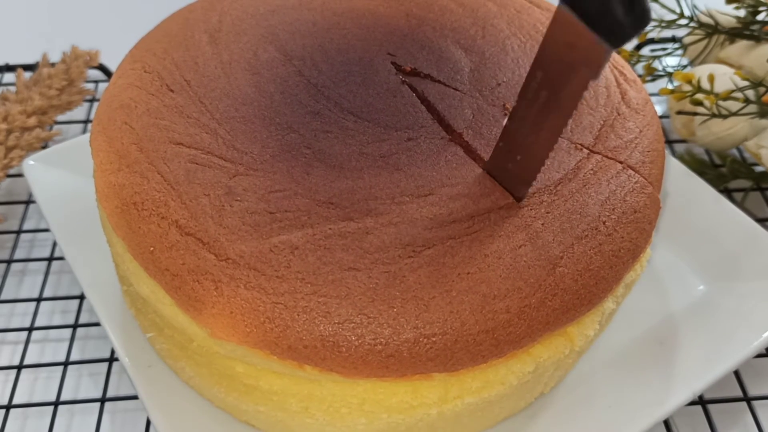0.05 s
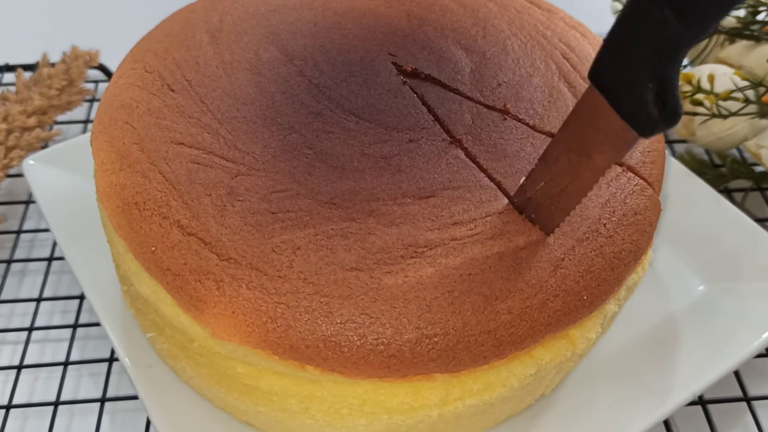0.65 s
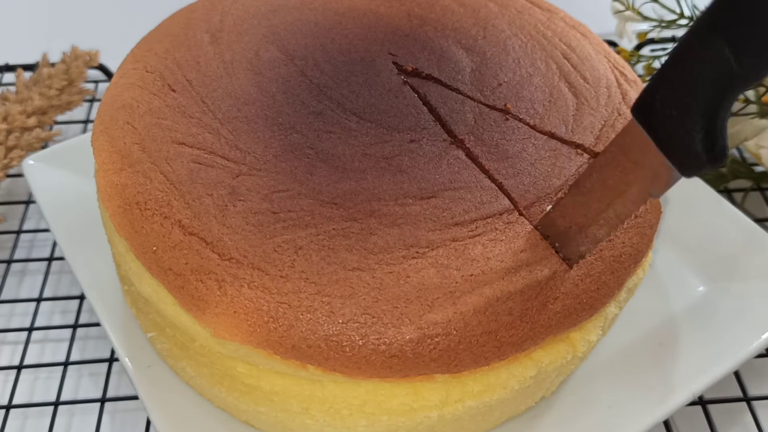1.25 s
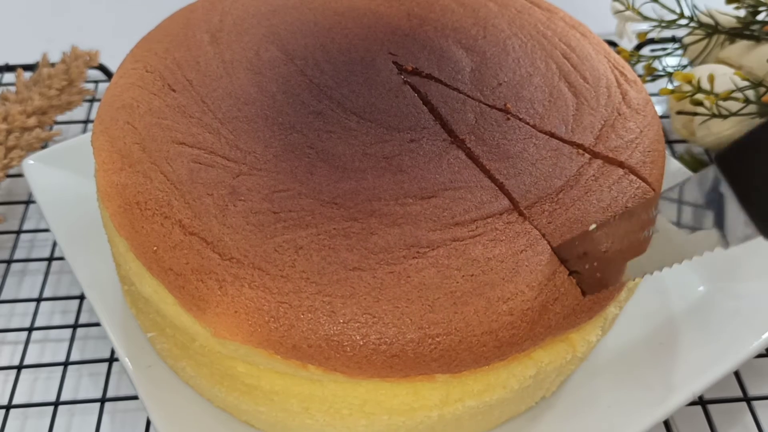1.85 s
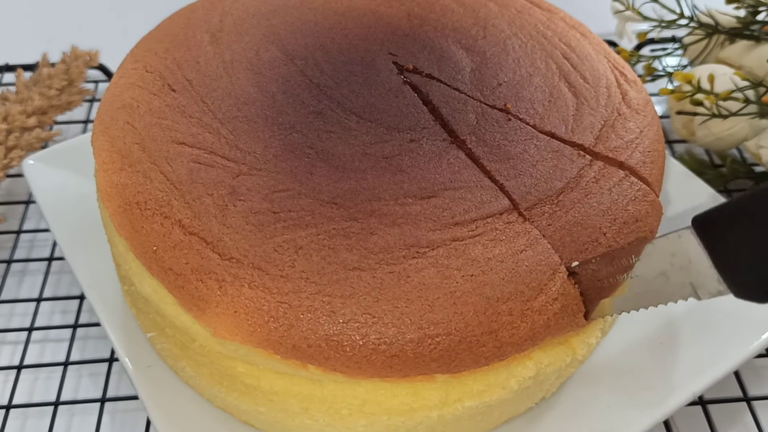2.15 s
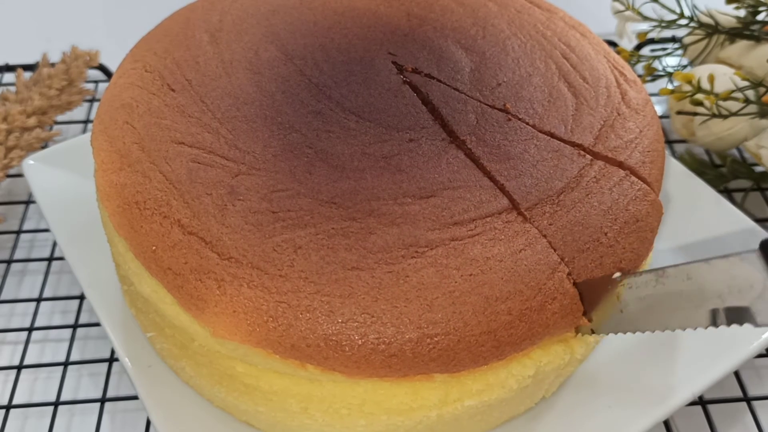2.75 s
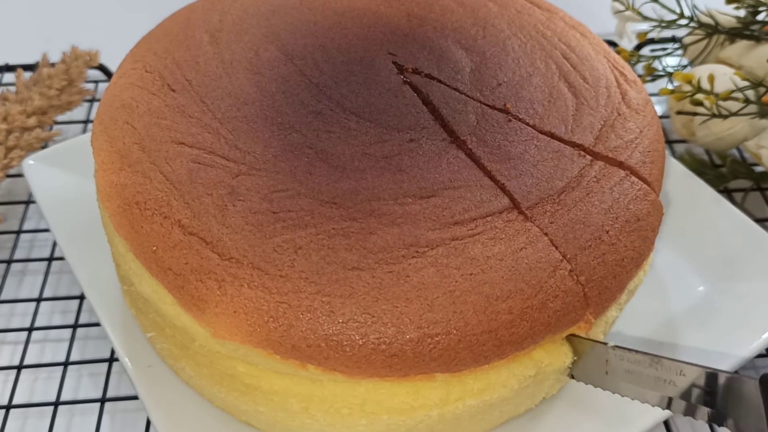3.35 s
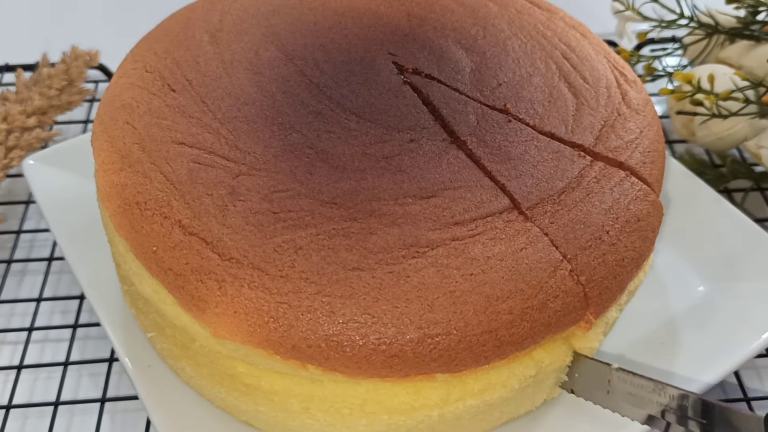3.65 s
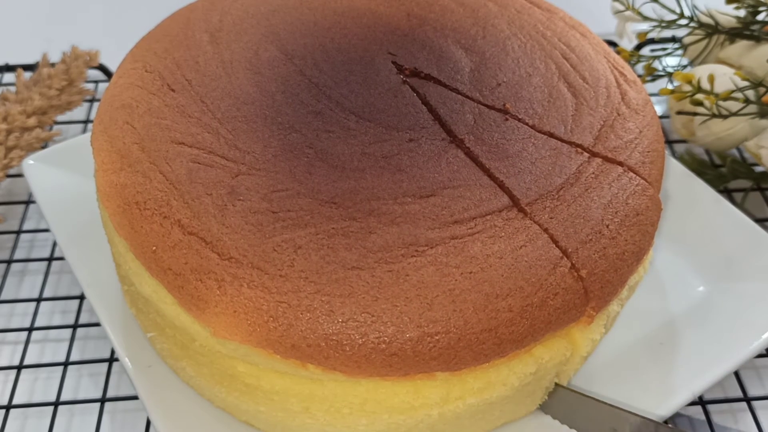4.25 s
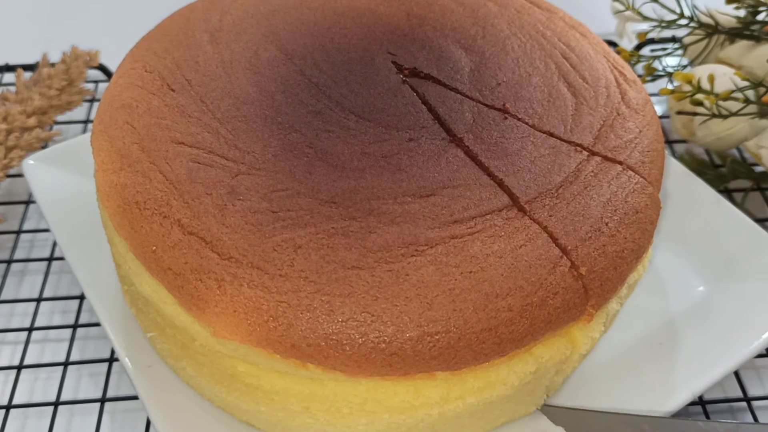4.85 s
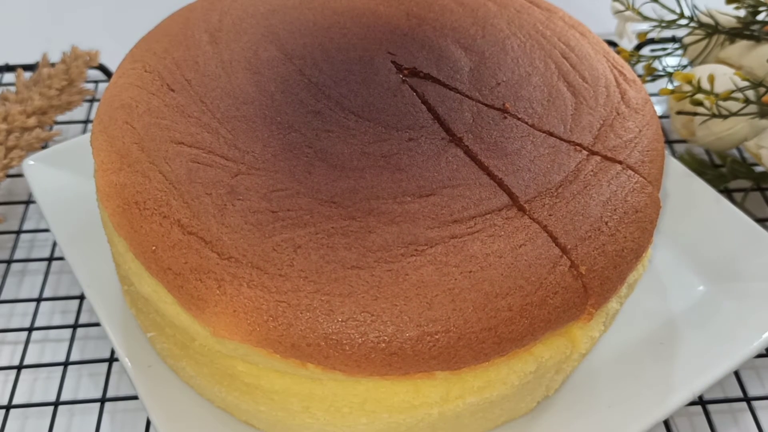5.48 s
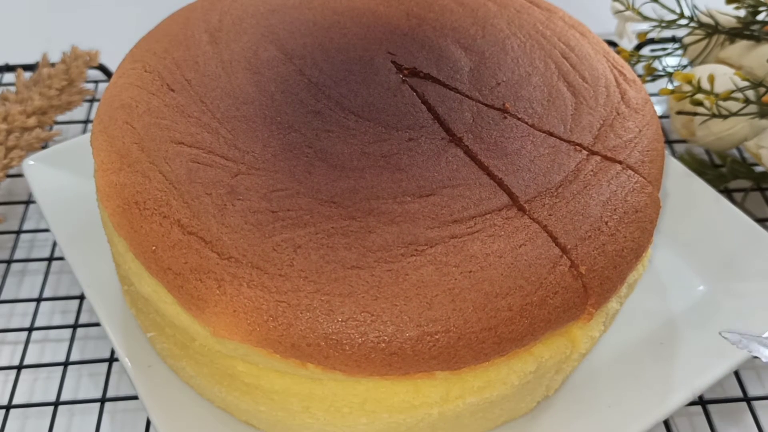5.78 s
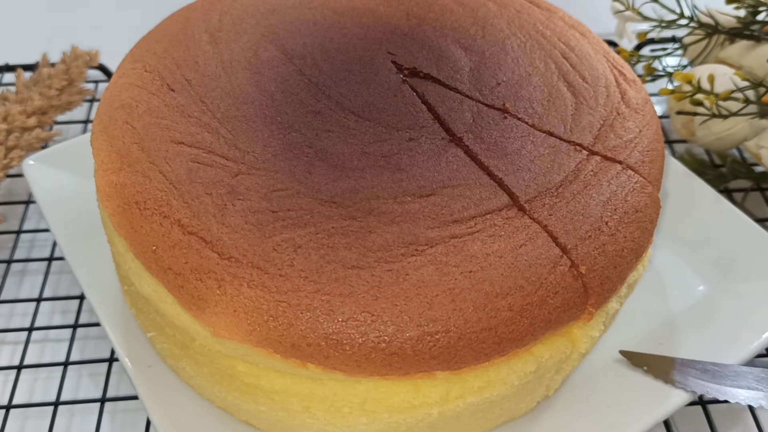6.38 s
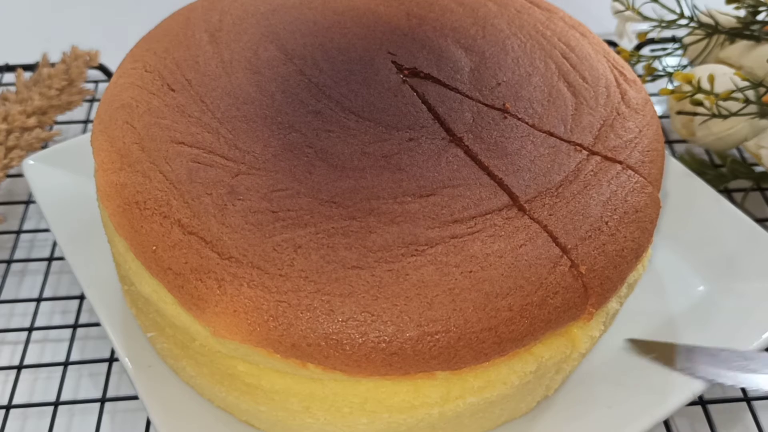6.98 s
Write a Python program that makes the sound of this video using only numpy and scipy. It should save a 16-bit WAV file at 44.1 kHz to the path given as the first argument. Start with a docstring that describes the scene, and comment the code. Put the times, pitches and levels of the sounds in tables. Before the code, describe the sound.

A serrated knife cuts through soft cake and strikes the ceramic plate beneath. Two firm clicks come first, each with a brief ring and a small thud into the table. Lighter, irregular clicks follow among tiny moist crumb ticks. Near the end the bare blade gives a brighter clink and a very faint scrape. The clicks sound close, with a short kitchen echo over a quiet appliance hum and airy hiss.

```python
"""A serrated knife clicks on a ceramic plate as it saws through soft cake, moving from middle to rim.
Each click rings the plate and the steel blade and thuds into the table below.
The cake damps the plate, so each click is short and the kitchen rings on after it.
Moist crumbs tick, the blade drags faintly over the glaze, and an appliance hums in the room."""
import sys
import numpy as np
from scipy import signal
from scipy.fft import rfft, irfft, next_fast_len
from scipy.io import wavfile
from scipy.ndimage import map_coordinates

SR = 44100
rng = np.random.default_rng(int(sys.argv[2]) if len(sys.argv) > 2 else 0)


def wav_record(signal):
    """Record a signal, one row per channel, as 16-bit PCM in the file named by sys.argv[1]."""
    frames = np.transpose(np.atleast_2d(signal))
    bounded = np.clip(frames, -1, 1)
    # unit amplitude maps onto the largest positive 16-bit level
    quanta = np.round(bounded * 32767).astype(np.int16)
    wavfile.write(sys.argv[1], SR, quanta)


N = 313988
LEAD = SR // 4  # samples of run-up before time zero


def amp(db):
    """Turn decibels into a number to multiply by."""
    return 10 ** (np.asarray(db) / 20)


def unit(x):
    """Scale a sound to an average strength (rms) of 1."""
    return x / np.sqrt(np.mean(x ** 2) + 1e-20)


def along(points, hz):
    """Read between (frequency, value) points, with octaves evenly spaced."""
    freqs, values = np.transpose(points)
    return np.interp(np.log(hz + 1), np.log(freqs + 1), values)


def filtered(x, response):
    """Turn each frequency up or down by the gain response(hz)."""
    n = x.shape[-1]
    padded = next_fast_len(n + 4096)
    return irfft(rfft(x, padded) * response(np.fft.rfftfreq(padded, 1 / SR)), padded)[..., :n]


def noise(spectrum, shape):
    """Noise of strength 1, its tone shaped by (frequency, level) points."""
    return unit(filtered(rng.standard_normal(shape), lambda hz: amp(along(spectrum, hz))))


def wobble(rate):
    """A smooth curve along random points, rate of them a second."""
    points = rng.standard_normal(int(N * rate / SR) + 4)
    return map_coordinates(points, [np.arange(N) * rate / SR], order=2)


def fade(t, t60):
    """Die away by 60 dB in t60 seconds, the ring time."""
    return np.exp(-np.log(1000) * t / t60)


def add(track, at, sound):
    """Mix a sound into a track, starting at a time in seconds."""
    start = max(LEAD + round(at * SR), 0)
    part = track[:, start:start + sound.shape[-1]]
    part += sound[..., :part.shape[-1]]


# Tone of the air's rush, shared by left and right: f/Hz, relative level/dB
AIR_SHARED = [(15, -70), (25, -40), (44, -19), (69, -42), (91, -1.5), (162, -4.5), (192, -0.5), (217, -6.5),
              (249, 1), (319, -7.5), (415, -2), (531, -14.5), (844, -8.5), (1000, -17), (1300, -34),
              (2200, -120)]
# Tone of the rush that is opposite in left and right, so it sounds wide: f/Hz, relative level/dB
AIR_WIDE = [(15, -75), (25, -25), (91, -6), (195, -4.5), (220, -15), (314, -1), (350, -3), (469, -8.5),
            (539, -6), (620, -11), (769, 0), (1000, -12), (1300, -6.5), (2200, -120)]
# Tone of the fine hiss: f/Hz, relative level/dB
HISS_TONE = [(600, -54), (1000, 0.5), (1400, -1), (2200, -1.5), (2700, -7), (4500, -9), (5300, -17.5),
             (6600, -9.5), (8200, -14), (12000, -13.5), (15000, -10.5)]


def room_air(shared_db=-53.5, wide_db=-57, hiss_db=-57):
    """The air in the room makes a low rush with a fine hiss on top."""
    shared = amp(shared_db) * noise(AIR_SHARED, N)
    wide = amp(wide_db) * noise(AIR_WIDE, N) * np.array([[1], [-1]])
    hiss = amp(hiss_db) * noise(HISS_TONE, (2, N))
    return shared + wide + hiss


# The notes in the appliance's hum: f/Hz, level/dB
HUM_NOTES = [(63, -72.5), (100.3, -67), (245, -74.5), (408, -83), (664, -74.5), (867, -73.5)]


def appliance_hum(waver_db=2, drift_radians=0.29):
    """An appliance hums a few low notes that waver in loudness and pitch."""
    t, hum = np.arange(N) / SR, np.zeros(N)
    for hz, db in HUM_NOTES:
        gain = np.sqrt(2) * amp(db + waver_db * wobble(3.7))
        hum += gain * np.sin(2 * np.pi * hz * t + drift_radians * wobble(5.3))
    return hum


# How long the kitchen rings on: f/Hz, ring time/s
ROOM_RING = [(150, 0.44), (1400, 0.98), (3000, 0.81), (6600, 0.58), (9000, 0.37), (15000, 0.5)]
# The first echoes off the walls: delay/s, level/dB
WALL_ECHOES = [(.0235, -14.3), (.028, -21), (.032, -14), (.0415, -22), (.055, -22)]


def kitchen_echo(x, tail_db=-13.5, build_up_s=0.02, early_db=-16, wall_hz=2100):
    """The walls send back a few dull echoes, and many more blur into a fading tail."""
    out, block = np.zeros_like(x), SR // 2
    for start in range(0, x.shape[1], block):  # a fresh random tail every half second
        hz, t, bands = signal.stft(rng.standard_normal((2, SR)), SR, nperseg=256)
        build_up = np.where(t < build_up_s, amp(early_db), 1)
        decay = fade(t, along(ROOM_RING, hz)[:, None])
        tail = signal.istft(bands * build_up * decay, SR, nperseg=256)[1]
        tail *= amp(tail_db) * np.sqrt(2) / np.linalg.norm(tail)
        echo = signal.fftconvolve(x[:, start:start + block], tail, axes=1)[:, :x.shape[1] - start]
        out[:, start:start + echo.shape[1]] += echo
    dulled = filtered(x, lambda hz: 1 / np.sqrt(1 + (hz / wall_hz) ** 4))
    for delay, db in WALL_ECHOES:
        lag = round(delay * SR)
        out[:, lag:] += amp(db) * dulled[:, :-lag]
    return out


# Rubs on the glaze: middle t/s, length/s, f/Hz, pitch slide/(Hz per s), width/Hz, level/dB
BLADE_RUBS = [(3.749, .28, 4280, -4000, 520, -65.5), (3.772, .42, 4580, 0, 240, -70),
              (6.918, 0.46, 3030, 0, 110, -64.5), (6.97, 0.5, 3840, -2, 240, -61.5)]


def blade_rubs():
    """The flat of the blade sings faintly on the glaze: a narrow band of noise that may slide in pitch."""
    out = np.zeros((2, LEAD + N))
    for middle, length, centre_hz, slide, width_hz, db in BLADE_RUBS:
        n = int(length * SR)
        hiss = rng.standard_normal((2, SR))
        band = unit(filtered(hiss, lambda hz: 1 / (1 + (2 * (hz - centre_hz) / width_hz) ** 2)))
        from_middle = np.arange(n) / SR - length / 2
        pitch_shift = np.exp(1j * np.pi * slide * from_middle ** 2)
        rub = np.real(signal.hilbert(band)[:, :n] * pitch_shift)
        add(out, middle - length / 2, amp(db) * rub * signal.windows.tukey(n, 0.75))
    return out


# Teeth graze the plate: middle t/s, length/s, level/dB, bare (0 blade in the cake, 1 out of it)
TOOTH_GRAZES = [(4.888, 0.23, -68, 0), (6.613, 0.057, -67.5, 1), (6.997, 0.089, -68, 1),
                (7.043, 0.037, -60.5, 1)]


def tooth_grazes(slips_per_s=700):
    """The teeth slip in many tiny jerks, and each one rings the plate and the blade."""
    out, t = np.zeros((2, LEAD + N)), np.arange(SR // 20) / SR
    for middle, length, db, bare in TOOTH_GRAZES:
        n = int(length * SR)
        strengths = rng.standard_normal(SR)[:n] * np.hanning(n)
        slips = strengths * (rng.random(SR)[:n] < slips_per_s / SR)
        ring = plate_ring(t, place=0.37, tilt=10) + blade_ring(t, bare, tilt=0.5)
        scrape = signal.fftconvolve(slips[None], ring, axes=1)
        add(out, middle - length / 2, amp(db) * unit(scrape))
    return out


# The clearest snaps of crumb leaving the blade: t/s, level/dB
CRUMB_SNAPS = [(0.4562, -40), (1.9384, -38.5), (1.9903, -42), (2.271, -44), (3.582, -40), (4.2177, -42.5),
               (4.2905, -46), (5.2843, -44)]


def crumb_ticks(t60=0.011, low_hz=6000, faint_count=2, faint_db=-7.5, scatter_s=0.043):
    """Moist cake tears in tiny bright snaps, each clear one among a few fainter ones."""
    out, t = np.zeros((2, LEAD + N)), np.arange(SR // 50) / SR
    faint = [(at + scatter_s * rng.standard_normal(), db + faint_db)
             for at, db in CRUMB_SNAPS for _ in range(faint_count)]
    for at, db in CRUMB_SNAPS + faint:
        hiss = rng.standard_normal((2, len(t)))
        snap = unit(filtered(hiss, lambda hz: hz ** 6 / (hz ** 6 + low_hz ** 6)))
        add(out, at, amp(db) * snap * fade(t, t60))
    return out


# The low notes of the table under the plate: f/Hz, ring time/s, relative level/dB
TABLE_NOTES = [(162, 0.082, -11), (245, 0.029, -2.5), (292, 0.069, -12.5), (460, 0.018, 0.5),
               (640, 0.018, 2)]


def table_thud(t, place, middle_db=-21, rim_change_db=-6.5, band_hz=(105, 850)):
    """The plate's foot passes a blow to the table; less gets through from the overhanging rim."""
    thud = sum(amp(db) * np.sin(2 * np.pi * hz * t) * fade(t, t60) for hz, t60, db in TABLE_NOTES)
    # the table top gives off neither deep bass nor treble
    thud = signal.sosfilt(signal.butter(4, band_hz, "band", fs=SR, output="sos"), thud)
    return amp(middle_db + rim_change_db * place ** 2) * thud


# Tone of steel hitting glaze: f/Hz, relative level/dB
CRACK_TONE = [(150, -40), (400, -26), (720, 2), (980, -6.5), (1700, -6.5), (2500, 2.5), (4400, -1.5),
              (5700, -13.5), (6500, -4.5), (8200, 0.5), (12000, -8.5), (15500, -12)]


def glaze_crack(t, place, bare, tilt, t60=0.025, rise_s=0.0013):
    """Steel hits glaze with a burst of noise, louder toward the rim and with a bare blade."""
    tone = [(hz, db + brighten(hz, tilt)) for hz, db in CRACK_TONE]
    burst = noise(tone, (2, len(t))) * fade(t, t60) * (1 - np.exp(-t / rise_s))
    crack_db = -13.5 + 6.5 * place + 16 * bare
    return amp(crack_db) * burst


def brighten(hz, tilt):
    """Decibels to add at each frequency: tilt dB for every octave above 2500 Hz."""
    return tilt * np.log2(hz / 2500)


def ringing(t, hz, t60, level_db, pan_db, scatter_db=0.5, rise_s=0.001, spread_hz=2800, detune=0.0015):
    """Fading notes in stereo; the knife's load shifts their pitch and strength a little at every blow."""
    level_luck, pan_luck, skew_luck, pitch_luck = rng.standard_normal((4, len(hz)))
    sides = np.array([[1], [-1]])
    gain = amp(level_db + sides * pan_db / 2 + scatter_db * (level_luck + sides * pan_luck))
    gain *= (-1) ** np.arange(len(hz))  # neighbouring notes swing opposite ways
    hz = hz * (1 + detune * pitch_luck)
    # high notes reach the two microphones out of step
    skew = sides * np.minimum(hz / spread_hz, np.pi / 4) * np.sign(skew_luck)
    waves = np.sin(2 * np.pi * hz[:, None] * t + skew[..., None]) * fade(t, t60[:, None])
    return np.sum(gain[..., None] * waves, axis=1) * (1 - np.exp(-t / rise_s))


# The notes of the bare steel blade, held in the hand: f/Hz, ring time/s, relative level/dB
BLADE_NOTES = [(1985, 0.13, -17), (2680, 0.037, -8.5), (2967, 0.03, -4), (2960, 0.36, -24),
               (3260, 0.03, -9), (3666, 0.24, -24), (3970, 0.026, -19), (4270, 0.021, -9),
               (4930, 0.26, -24), (6520, 0.25, -25), (7300, 0.024, -21), (7605, 0.053, -9),
               (8270, 0.04, -13), (12000, 0.036, -12), (12600, 0.077, -20), (13250, 0.04, -21),
               (14300, 0.04, -16), (14720, 0.09, -15), (15350, 0.06, -20)]


def blade_ring(t, bare, tilt, buried_db=-12.5, bare_gain_db=19, buried_ring_share=0.27):
    """Cake chokes the steel; the barer the blade, the louder and longer it rings."""
    hz, t60, db = np.transpose(BLADE_NOTES)
    t60 = t60 * buried_ring_share ** (1 - bare)
    level_db = db + buried_db + bare_gain_db * bare + brighten(hz, tilt)
    return ringing(t, hz, t60, level_db, pan_db=0)


# The plate's notes: f/Hz, ring time/s, left over right/dB, then relative level/dB when it is hit
# in the middle, a third of the way out, two thirds out and on the rim
PLATE_NOTES = [(1175, 0.032, 1.5, -7.5, -18.5, -19.5, -33), (1353, 0.029, -3, -5.5, -1, -20, -16),
               (1484, 0.022, -5, -3, -19, -15, -23), (1640, 0.021, -1, -14.5, -2.5, -24, -26),
               (1995, 0.028, 0, -18, -11, -14.5, -4), (2590, 0.0069, -2, 0, -14, -3, -27),
               (2920, 0.017, 0.5, -12, -4, -6, -16), (3155, 0.019, 2.5, -11.5, -10.5, -7, -10),
               (3478, 0.042, 2, -27, -13, -24, -3), (3720, 0.027, -6, -29, -30, -10, -15),
               (4160, 0.013, -3, -14, -33, -18, -21), (4645, 0.023, -9, -20, -20, -26, -13),
               (5020, 0.026, 2.5, -22.5, -18, -6.5, -8), (5370, 0.015, 9, -33, -17, -28, -16),
               (6574, 0.025, 1.5, -12, -4.5, -5, 2.5), (6730, 0.02, 8, -19, -22, -19, -14),
               (7670, 0.023, 3, -17.5, -16.5, -35, -10), (8220, 0.052, 6, -34, -17.5, -24, -16),
               (12000, 0.03, -8, -31, -28, -44, -38), (12755, 0.016, -2, -30, -28, -42, -31),
               (13500, 0.012, -13, -23, -29, -29, -7), (14456, 0.022, -3, -32, -22, -32, -20)]


def plate_ring(t, place, tilt, low_hz=1050):
    """The plate rings with many short notes; where the knife lands sets how strong each one is."""
    hz, t60, pan_db, *spots_db = np.transpose(PLATE_NOTES)
    spots = np.linspace(0, 1, len(spots_db))
    level_db = np.array([np.interp(place, spots, note_db) for note_db in np.transpose(spots_db)])
    ring = ringing(t, hz, t60, level_db + brighten(hz, tilt), pan_db)
    # the plate is too small to give off sound below its lowest note
    return signal.sosfilt(signal.butter(5, low_hz, "high", fs=SR, output="sos"), ring)


# The knife hits the plate: t/s, relative level/dB, place (0 middle, 1 rim),
# bare (0 blade in the cake, 1 out of it), left over right/dB
KNIFE_HITS = [(-0.085, -10.5, 0.072, 0, 1.5), (0.5484, -7, 0.067, 0.052, 1.5),
              (1.243, -12, 0.16, 0.091, 1.5), (2.083, -32.5, 0.18, 0.17, 3), (2.9423, -28, 0.42, 0, 3),
              (3.0243, -36.5, 0.38, 0.07, 1), (3.815, -38, 0.47, 0, 0), (4.2994, -24, 0.62, 0, 0),
              (4.937, -33, 0.94, 0.063, -3), (4.9674, -31.5, 1, 0.64, -12), (4.9698, -24.5, 0.99, 0.35, 1),
              (5.0017, -32, 0.98, 0.06, -0.5), (6.236, -31, 0.59, 0.86, -1.5), (6.2395, -41, 0.82, 0.75, 0),
              (6.2485, -38.5, 0.54, 0.59, 10), (6.5472, -47, 0.68, 0.92, 0)]


def knife_clicks(firm_db=0.5, tilt_per_db=0.1261, bare_tilt=6):
    """Each hit rings the plate and blade, and knocks: a crack on the glaze and a thud in the table."""
    rings, knocks = np.zeros((2, 2, LEAD + N))
    t = np.arange(SR // 4) / SR
    for at, db, place, bare, pan_db in KNIFE_HITS:
        # a harder hit is shorter and so brighter; a bare blade is brighter too
        tilt = tilt_per_db * (db - firm_db) + bare_tilt * bare
        gain = amp(db) * amp([[pan_db / 2], [-pan_db / 2]])
        add(rings, at, gain * (plate_ring(t, place, tilt) + blade_ring(t, bare, tilt)))
        add(knocks, at, gain * (glaze_crack(t, place, bare, tilt) + table_thud(t, place)))
    return rings, knocks


# How well the plate's face throws each pitch into the room: f/Hz, gain/dB
PLATE_THROW = [(1180, -5.5), (1350, -1), (1470, 1), (1640, -3), (2000, 1), (2600, -5), (3100, -1.5),
               (3500, -5), (4900, -0.5), (6600, 0), (13000, 4)]


def scene(knock_room_db=-4):
    """Mix it all; the broad ringing plate fills the kitchen more than the small knocks and snaps do."""
    rings, knocks = knife_clicks()
    rings += tooth_grazes() + blade_rubs()
    knocks += crumb_ticks()
    thrown = filtered(rings, lambda hz: amp(along(PLATE_THROW, hz)))
    echo = kitchen_echo(thrown + amp(knock_room_db) * knocks)
    return (rings + knocks + echo)[:, LEAD:] + room_air() + appliance_hum()


# The microphone's tone: f/Hz, gain/dB
MIC_TONE = [(8400, -0.5), (8900, -17.5), (11300, -23), (11700, -7)]
TOP_HZ = 15750


def record(dry):
    """The microphone dips in the high treble and cuts off the very highest sounds."""
    return filtered(dry, lambda hz: amp(along(MIC_TONE, hz)) * (hz < TOP_HZ))


dry = scene()
out = record(dry)
wav_record(out)
```